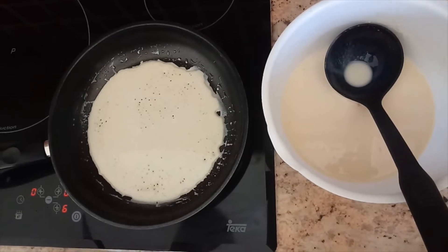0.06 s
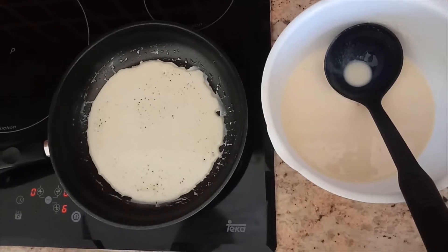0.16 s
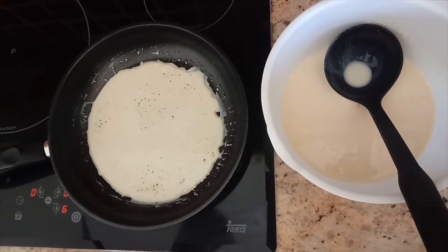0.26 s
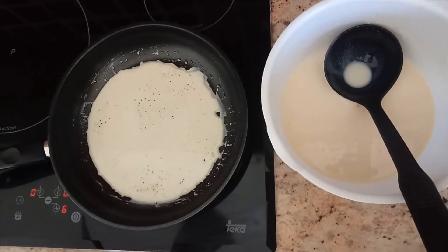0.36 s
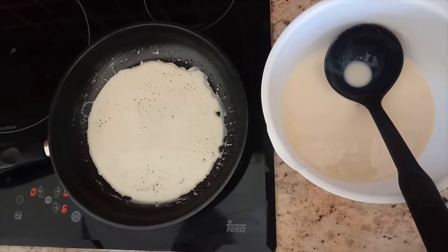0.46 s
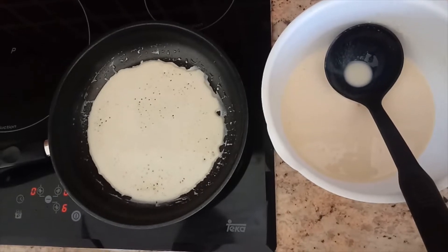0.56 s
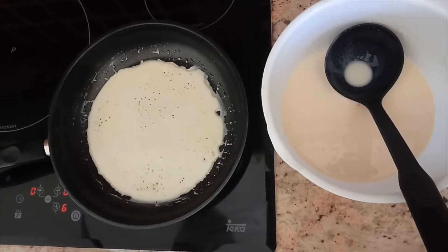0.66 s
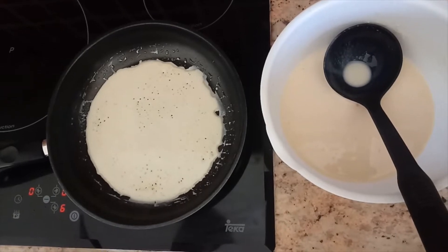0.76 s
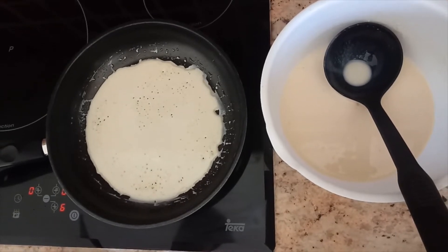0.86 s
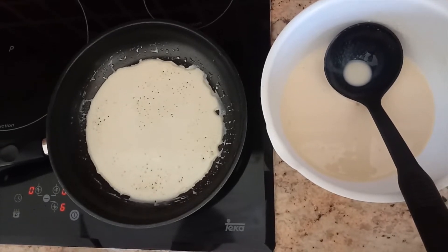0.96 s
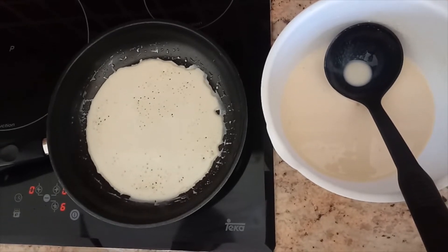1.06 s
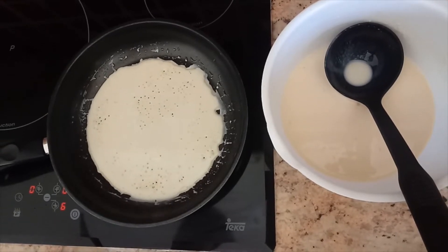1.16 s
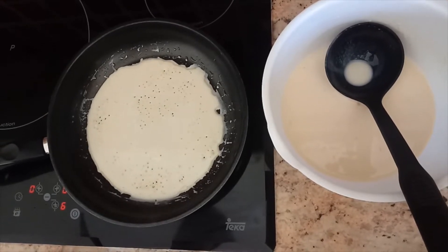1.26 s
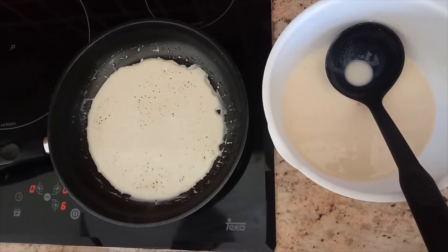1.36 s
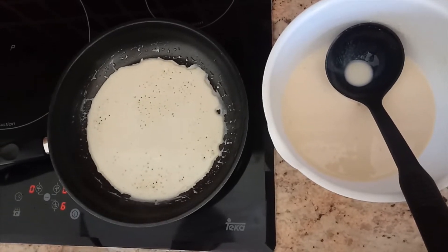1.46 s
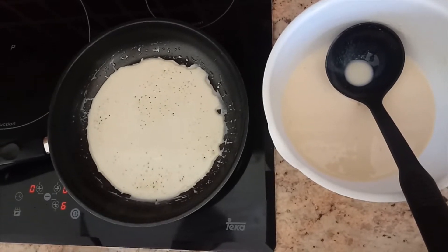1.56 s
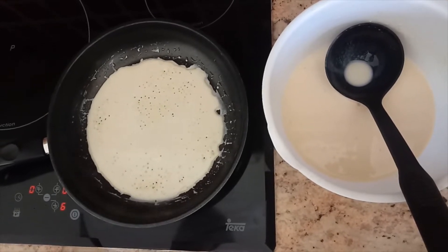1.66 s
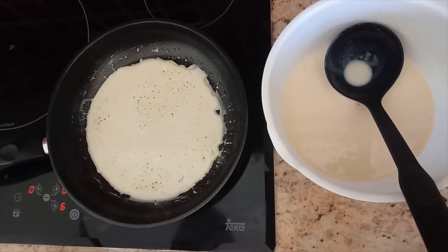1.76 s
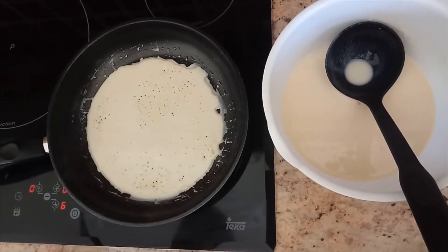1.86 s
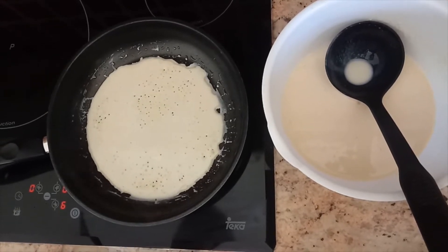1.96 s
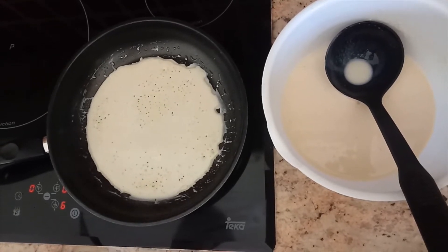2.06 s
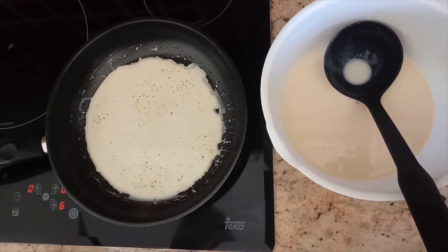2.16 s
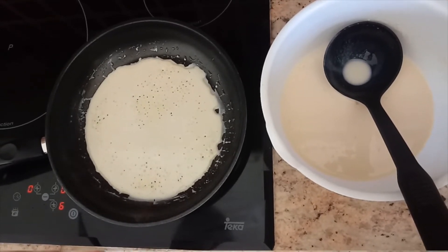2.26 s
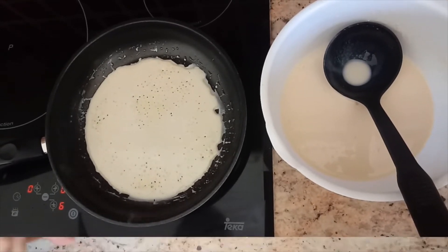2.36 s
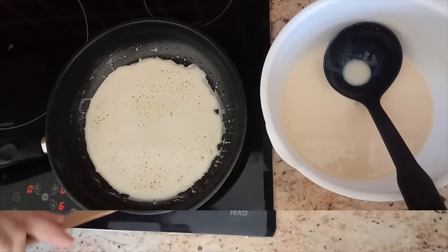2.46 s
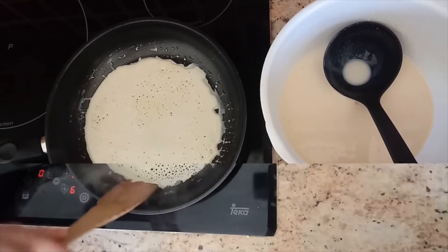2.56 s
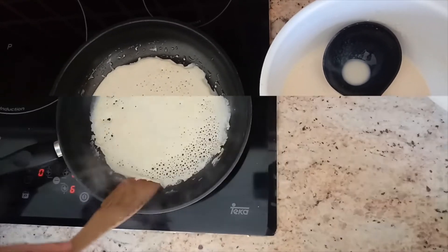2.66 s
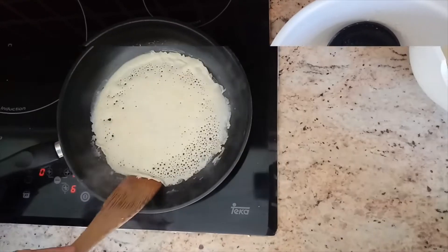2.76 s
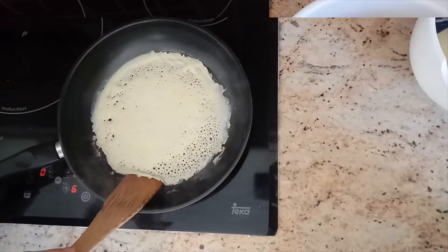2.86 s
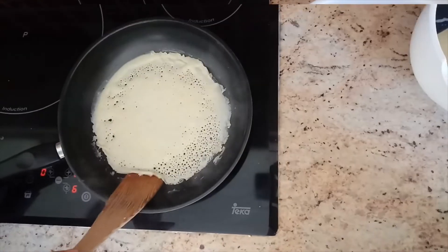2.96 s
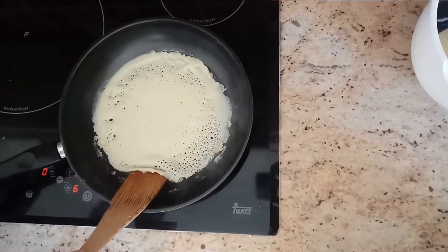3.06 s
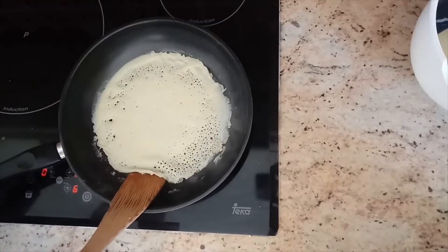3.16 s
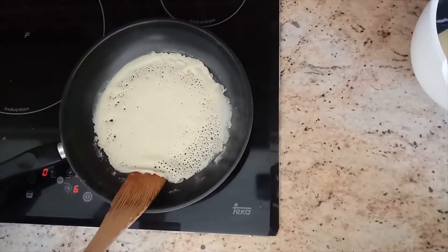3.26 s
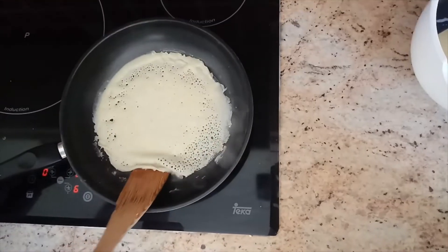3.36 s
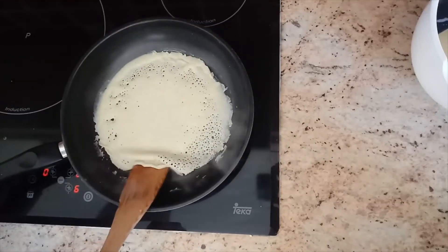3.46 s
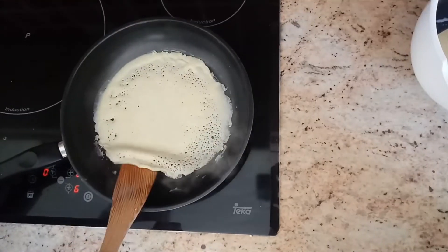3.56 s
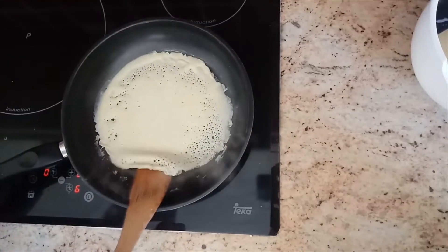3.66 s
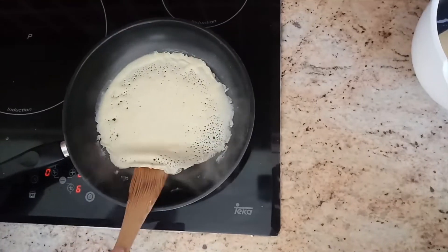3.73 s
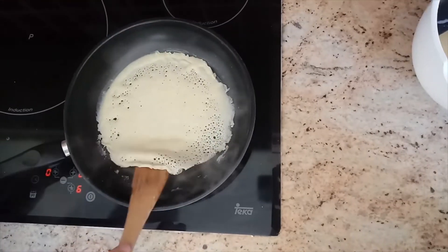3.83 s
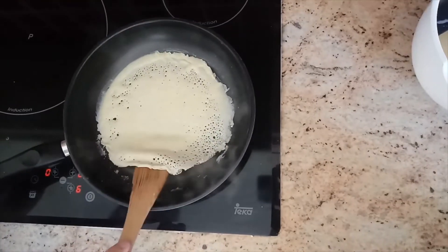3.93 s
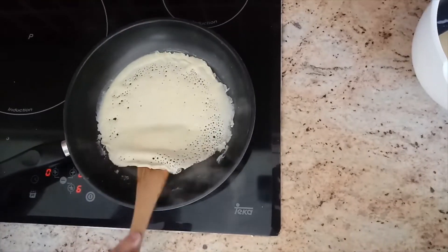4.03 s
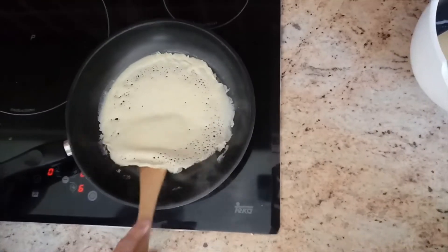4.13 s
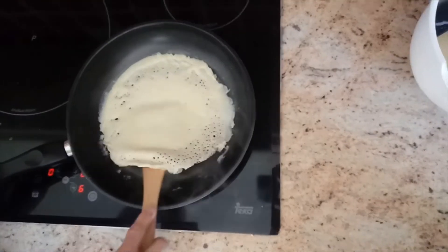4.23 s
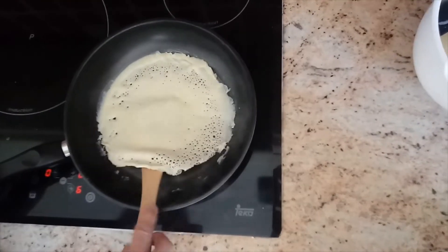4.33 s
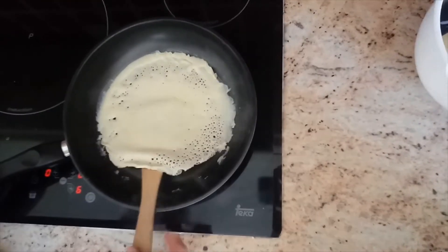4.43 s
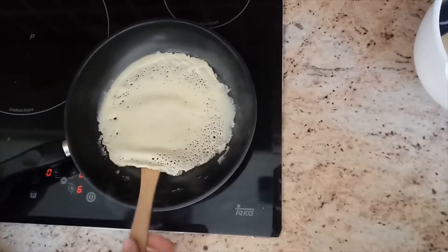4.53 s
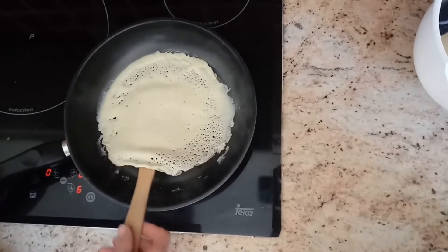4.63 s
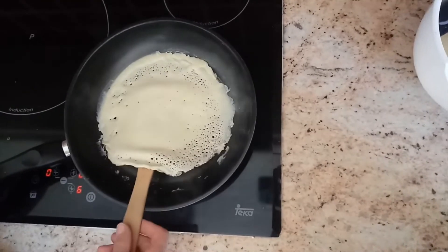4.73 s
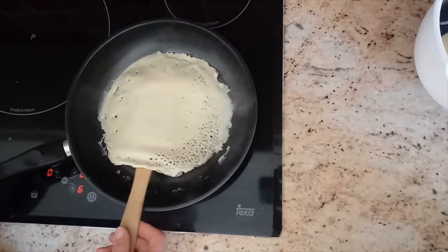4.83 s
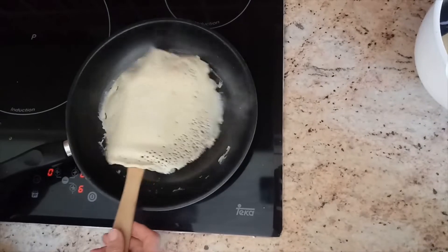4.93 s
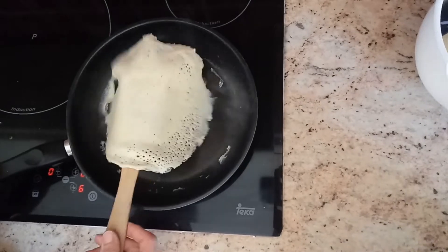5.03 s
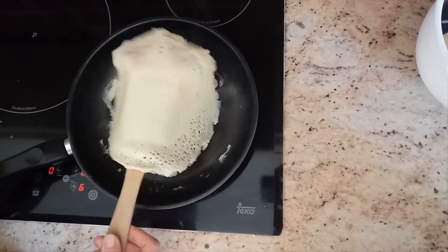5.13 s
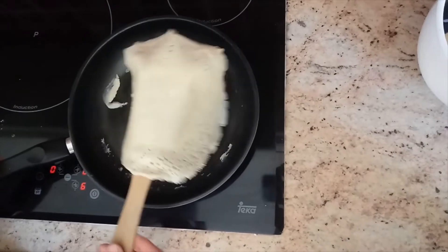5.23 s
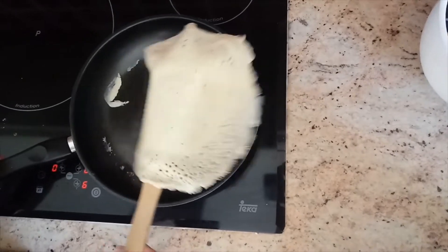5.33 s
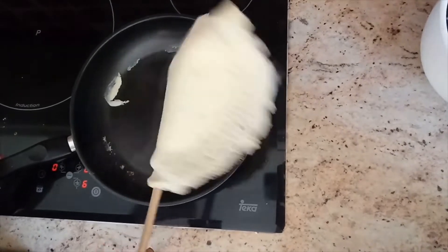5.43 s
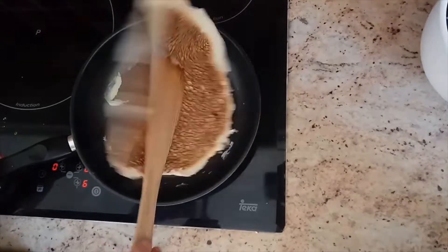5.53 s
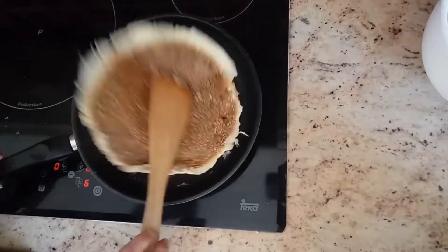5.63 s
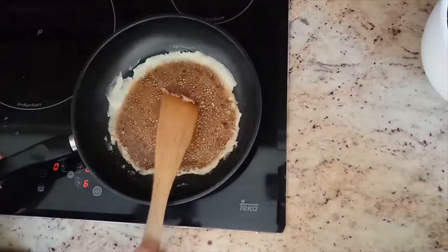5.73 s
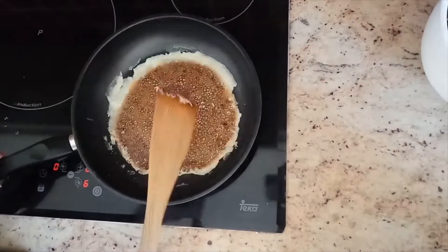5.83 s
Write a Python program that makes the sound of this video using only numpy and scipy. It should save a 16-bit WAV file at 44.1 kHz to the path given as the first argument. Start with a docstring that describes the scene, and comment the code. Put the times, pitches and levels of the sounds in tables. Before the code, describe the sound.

A pancake sizzles faintly in a pan, a wooden spatula scrapes and knocks under it, then it flips and slaps down with a loud hiss.

```python
"""A pancake sizzles faintly in a non-stick pan on a glass hob: noise grains and tiny ringing bubbles.
A wooden spatula knocks on the pan and scrapes under the edge, through damped modes of the pan.
Steam crackles out in puffs, pops and faint whistles; the pancake is lifted and flipped.
The wet side slaps onto the hot metal and hisses loudly: decaying splashes, a thump and dense noise grains.
Underneath are a sine hum and drone from the hob, a thin fluttering whine and the still air of the kitchen."""
import sys
import numpy as np
from scipy import signal
from scipy.fft import rfft, irfft, next_fast_len
from scipy.io import wavfile
from scipy.ndimage import uniform_filter1d, map_coordinates

SR = 44100
rng = np.random.default_rng(int(sys.argv[2]) if len(sys.argv) > 2 else 0)


def file_out(sig):
    """Save sig as 16-bit WAV at sys.argv[1]."""
    # one column per channel
    cols = np.atleast_2d(sig).T
    # limit, then scale
    lim = np.clip(cols, -1, 1)
    pcm = np.round(lim * 32767).astype(np.int16)
    wavfile.write(sys.argv[1], SR, pcm)


N = 259749

# parts of the wet side slapping down: start_s [s], peak_db [dB]
SLAPS = [(5.7459, -11), (5.7526, -25), (5.7737, -17), (5.823, -23)]
# modes of the freely ringing pan: pitch_hz [Hz], level_db [dB], t60_s [s]
PAN_MODES = [(202, -0.5, 0.06), (273, 0.5, 0.085), (609, -2, 0.11), (771, -4.5, 0.23), (1001, -5, 0.1),
             (1278, -4, 0.09), (1364, 1, 0.078), (1430, -14.5, 0.34), (1900, -16, 0.055), (1920, -10, 0.3),
             (2260, -3.5, 0.043), (3730, -0.5, 0.11)]
# bright sizzle spectrum, also the wooden click: freq_hz [Hz], density_db [dB per Hz]
SIZZLE_SPECTRUM = [(1000, -84), (2400, -49), (3100, -26), (3700, -8), (4800, 4), (5700, 5), (6600, 0.5),
                   (7200, -19.5), (8200, -37), (14000, -52), (14800, -20.5), (15600, -16.5), (16200, -37)]


def frying():
    """Steam bubbles burst along the rim; puffs add to them, sound the hollow underneath and throw fine spray."""
    # steady frying: time_s [s], sizzle_db [dB], spread_db of bubble sizes [dB]
    simmer = [(0, -55.5, 6), (1.0, -55, 4), (2.2, -54, 4.5), (3.2, -56.5, 8), (4.2, -57.5, 4),
              (4.8, -61, 6.5), (5.15, -68.5, 9.5), (5.7, -58, 12.5)]
    # puffs of steam from underneath: full_s [s], rise_s [s], length_s [s], sag_db [dB],
    # sizzle_db [dB], hollow_db [dB]
    puffs = [(1.057, 0.096, 0.13, 3.5, -46.5, -73), (1.343, 0.17, 0.63, 8.5, -48, -77),
             (2.585, 0.036, .16, -3, -55, -70.5), (2.841, .04, 0.085, 3, -52, -64.5),
             (3.031, 0.083, .19, -2, -43.5, -56), (3.286, 0.011, 0.044, 1.5, -44, -60.5),
             (3.417, 0.058, 0.16, 7.5, -42.5, -57.5), (3.749, 0.024, 0.035, 0, -48.5, -62.5),
             (3.869, 0.064, .45, 6, -44, -57.5), (4.448, 0.019, 0.035, 3, -49.5, -82),
             (4.675, 0.12, 0.031, 2, -54.5, -72), (4.857, .03, .04, 6, -58.5, -74.5),
             (4.955, .02, 0.027, 0.5, -55, -83), (5.231, .015, .012, 2, -56.5, -81),
             (5.331, 0.035, 0.23, 2.5, -49.5, -79.5), (5.588, .02, .06, 9, -52.5, -84)]
    # spectra of the fine spray and of the hollow under the pancake: freq_hz [Hz], density_db [dB per Hz]
    spray_spectrum = [(3000, -41), (6800, 17.5), (8400, -12.5), (9600, -3), (13000, 7), (14200, -8),
                      (15000, 19), (15700, 17), (16200, -15)]
    hollow_spectrum = [(500, -12), (1000, -20), (1300, -5), (1550, 0), (1800, 7), (2100, -2.5), (2400, 1.5),
                       (3000, -3.5), (4500, -22)]
    puff_t60_s = 0.24
    steady_hollow_db = -26  # against the steady sizzle
    spray_db, spray_at_db = -10.5, -47  # spray against the sizzle, at this sizzle level
    spray_growth = 1  # dB more spray against the sizzle for each dB of sizzle

    simmer_db, spread_db = curves(simmer)
    sizzle_level = amp(simmer_db)
    hollow_level = amp(simmer_db + steady_hollow_db)
    for full_s, rise_s, length_s, sag_db, sizzle_db, hollow_db in puffs:
        puff = swell(full_s, rise_s, length_s, sag_db, puff_t60_s)
        sizzle_level = np.hypot(sizzle_level, amp(sizzle_db) * puff)
        hollow_level = np.hypot(hollow_level, amp(hollow_db) * puff)
    spray_level = amp(spray_db) * (sizzle_level / amp(spray_at_db)) ** spray_growth

    # a wider spread of bubble sizes also comes in stronger clumps
    clumps = amp(.25 * spread_db * wobble(130))
    bursts = grains(9000, spread_db) * clumps
    fizz = coloured(bubbles(700, centre_hz=5125, scatter=.4, cycles=58), SIZZLE_SPECTRUM)
    rim = unit(coloured(bursts, SIZZLE_SPECTRUM) + 0.81 * fizz)
    rim = rim + spray_level * coloured(bursts, spray_spectrum)
    gurgle = bubbles(500, centre_hz=1750, scatter=.42, cycles=13)
    hollow = coloured(bursts + 0.53 * gurgle, hollow_spectrum)
    touch_s = SLAPS[0][0]
    return (sizzle_level * rim + hollow_level * hollow) * gate(0, touch_s, .005)


def pops():
    """A bubble or drop of fat snaps; the pan's wall returns the snap and spray patters for a moment."""
    # single bursts: start_s [s], peak_db [dB]
    snaps = [(0.545, -35.5), (0.6317, -35.5), (2.6828, -26.5), (2.8529, -26.5), (2.8802, -31),
             (2.9433, -30.5), (2.9548, -27.5), (3.0036, -26), (3.1618, -24), (3.1904, -27), (3.2005, -21),
             (3.2826, -20.5), (3.3051, -25.5), (3.3216, -32), (3.3697, -29.5), (3.5073, -25), (3.9722, -33),
             (4.8533, -29.5), (4.9427, -42.5), (5.0744, -44), (5.1673, -42.5), (5.3178, -38.5),
             (5.3453, -39), (5.378, -35), (5.4007, -35), (5.451, -31), (5.4917, -31), (5.5411, -29.5)]
    # spectrum of a snap: freq_hz [Hz], density_db [dB per Hz]
    crack_spectrum = [(400, -61), (1100, -47), (1800, -22.5), (3000, -20.5), (4500, -1.5), (6500, 4.5),
                      (7400, -10.5), (8500, -27), (13000, -21), (14300, -48), (15400, -0.5), (16300, -20)]
    patter_level, patter_t60_s = .14, 0.044  # level against the snap's impulse
    track, t = np.zeros(N), np.arange(SR // 16) / SR
    for start_s, peak_db in snaps:
        burst = patter_level * amp(-60 * t / patter_t60_s) * rng.standard_normal(len(t))
        burst[SR // 2000] += 1  # the snap
        burst[SR // 440] += .6  # its return from the wall
        add(track, start_s, peak_db, coloured(burst, crack_spectrum))
    return track


def whistle():
    """Steam through small vents in the batter sings faint notes, unsteady in pitch and level."""
    # notes: full_s [s], length_s [s], pitch_hz [Hz], level_db [dB]
    vents = [(.95, .15, 1787, -75.5), (1.11, 0.033, 1782, -60.5), (1.13, .04, 2200, -75),
             (1.17, 0.04, 2490, -78), (1.187, 0.038, 1276, -77)]
    rise_s, t60_s = .025, 0.1
    track = np.zeros(N)
    for full_s, length_s, pitch_hz, level_db in vents:
        hz = pitch_hz * (1 + .012 * wobble(150))
        level = amp(level_db + 1.6 * wobble(53.2))
        note = level * np.sin(2 * np.pi * np.cumsum(hz) / SR)
        track += note * swell(full_s, rise_s, length_s, 0, t60_s)
    return track


def scraping():
    """Wood catches and slips on the coating: a juddering rasp that rings the pan, over its rumble."""
    # pushes of the blade: full_s [s], rise_s [s], length_s [s], sag_db [dB],
    # rumble_db of the pan [dB], rasp_db of the wood [dB], centre_hz of the rasp [Hz]
    strokes = [(2.221, 0.017, 0.093, -5.5, -65.5, -63.5, 900), (2.341, 0.016, 0.22, 16, -51.5, -51.5, 800),
               (2.659, .015, .16, 8, -76, -65, 950), (3.707, 0.051, 0.23, 10, -54, -59, 610),
               (4.038, 0.024, .26, 9.5, -55.5, -57, 1300), (4.527, 0.055, 0.21, 0.5, -58, -80.5, 700)]
    # spectra of the wood's rasp and of the pan's rumble: freq_hz [Hz], density_db [dB per Hz]
    rasp_spectrum = [(300, -17), (600, 10.5), (800, 5), (1100, 5), (1400, -1.5), (1900, -9), (2500, 8),
                     (5000, -52)]
    rumble_spectrum = [(40, -33), (110, -2.5), (170, -10), (290, 0), (400, -8), (550, -30), (1200, -125)]
    stroke_t60_s, dry_level = 0.22, 1.2  # dying away; dry rasp against the ringing pan
    rasp_octaves, judder_db = 0.91, 2.6  # width about the rasp's centre; unevenness of the push

    track, t = np.zeros(N), np.arange(SR // 4) / SR
    judder = amp(judder_db * wobble(45))
    slips = grains(1200, 4.4) * judder
    rub = coloured(slips, rasp_spectrum)
    rumble = coloured(grains(3000, 2.2) * judder, rumble_spectrum)
    for full_s, rise_s, length_s, sag_db, rumble_db, rasp_db, centre_hz in strokes:
        # the angle of the blade colours the rasp
        def blade(hz):
            octaves = np.log2((hz + 1) / centre_hz)
            return np.exp(-(octaves / rasp_octaves) ** 2 / 2)
        dry_rasp = unit(filtered(rub, blade))
        # the pressure of the blade damps the pan further
        damped_pan = ring(PAN_MODES, t, scatter_db=5) * amp(-60 * t / 0.17)
        metal = signal.fftconvolve(dry_rasp, damped_pan)[:N]
        rasp = unit(unit(metal) + dry_level * dry_rasp)
        push = swell(full_s, rise_s, length_s, sag_db, stroke_t60_s)
        track += (amp(rumble_db) * rumble + amp(rasp_db) * rasp) * push
    return track


def knocks():
    """The wooden blade chatters on the pan while the contact lasts and sets it ringing."""
    # knocks: start_s [s], peak_db [dB], click_db, the bright click's peak [dB],
    # wood_db against the ring [dB], contact_s, time to the strongest chatter [s]
    hits = [(2.206, -35, -31.5, -2, 0.0024), (2.334, -34, -28.5, 0, 0.0028),
            (3.668, -41.5, -41, 1.5, 0.018), (3.834, -38, -52, 9, 0.0023), (4.033, -28, -52, 11, 0.003),
            (5.724, -48, -36.5, -10, 0.0017)]
    # spectrum of the dry wood: freq_hz [Hz], density_db [dB per Hz]
    wood_spectrum = [(100, -37), (200, -15), (500, -4.5), (900, -5.5), (1800, -2), (2500, -14.5),
                     (4000, -12), (6000, -96)]
    track, t = np.zeros(N), np.arange(SR // 3) / SR
    for start_s, peak_db, click_db, wood_db, contact_s in hits:
        contact = t / contact_s * np.exp(-t / contact_s) * rng.standard_normal(len(t))
        strike = contact + 4 * (t == 0)
        metal = signal.fftconvolve(strike, ring(PAN_MODES, t, scatter_db=2.5))[:len(t)]
        body = unit(metal) + amp(wood_db) * coloured(contact, wood_spectrum)
        add(track, start_s, peak_db, body)
        add(track, start_s, click_db, coloured(contact, SIZZLE_SPECTRUM))
    return track


def bumps():
    """The pan rocks on the glass: a soft, quickly damped note."""
    # bumps: time_s [s], peak_db [dB], pitch_hz [Hz]
    rocks = [(2.338, -37.5, 265), (3.692, -44.5, 282), (4.433, -38, 239), (5.778, -27, 248)]
    track, t = np.zeros(N), np.arange(SR // 8) / SR
    for time_s, peak_db, pitch_hz in rocks:
        push = t ** 2 * np.exp(-t / 0.0028)
        # the soft onset starts 3 ms early
        add(track, time_s - .003, peak_db, push * np.sin(2 * np.pi * pitch_hz * t))
    return track


def landing():
    """The wet side slaps down, thumps the pan and flashes into hissing, spluttering steam."""
    # modes of pan and hob under the pancake: pitch_hz [Hz], level_db [dB], t60_s [s]
    thump_modes = [(80, -1.5, 0.49), (118, 9, 0.39), (165.7, -3.5, 0.7), (220.8, 5, 0.31),
                   (293.5, -3, 0.42)]
    # the wet side frying: time_s [s], hiss_db [dB], splutter_db [dB]
    searing = [(5.76, -31.5, -38), (5.816, -29, -47.5), (5.822, -25.5, -44), (5.89, -32, -42.5)]
    # spectra of hiss and splutter: freq_hz [Hz], density_db [dB per Hz]
    hiss_spectrum = [(1500, -68), (3100, -22.5), (4200, -0.5), (5400, 5), (6600, 0.5), (7300, -13),
                     (8400, -28), (10000, -21.5), (13000, -18.5), (14200, -25), (15000, -7), (15600, -4),
                     (16200, -51)]
    splutter_spectrum = [(30, -6), (110, 3), (280, -1), (420, 7.5), (900, 14), (2500, 9), (3500, 12),
                         (6000, -41)]
    track, t = np.zeros(N), np.arange(SR // 4) / SR
    touch_s = SLAPS[0][0]
    add(track, touch_s, -23, ring(thump_modes, t, scatter_db=3))
    for start_s, peak_db in SLAPS:
        splash = amp(-60 * t / 0.047) * rng.standard_normal(len(t))
        slap = coloured(splash, hiss_spectrum) + 0.33 * coloured(splash, splutter_spectrum)
        add(track, start_s, peak_db, slap)
    hiss_db, splutter_db = curves(searing)
    bursts = grains(14000, 5) * amp(1.2 * wobble(120))
    steam = amp(hiss_db) * coloured(bursts, hiss_spectrum)
    steam += amp(splutter_db) * coloured(bursts, splutter_spectrum)
    return track + steam * gate(touch_s + 0.0016, N / SR, 0.00067)


def whine():
    """A thin high whine, a narrow band of noise, comes and goes in quick, uneven pulses."""
    # whines: start_s [s], length_s [s], pitch_hz [Hz], level_db [dB]
    tones = [(0, .45, 10830, -79), (4.52, 1, 11430, -81)]
    flutter_hz, width_hz = 28.97, 250
    track = np.zeros(N)
    pulses = np.sin(np.pi * flutter_hz * np.arange(N) / SR + .5 * wobble(15)) ** 4
    flutter = pulses * amp(5 * wobble(flutter_hz))
    for start_s, length_s, pitch_hz, level_db in tones:
        def narrow(hz):
            return np.exp(-((hz - pitch_hz) / width_hz) ** 2 / 2)
        band = filtered(rng.standard_normal(N), narrow)
        track += amp(level_db) * unit(band * flutter) * gate(start_s, start_s + length_s, .02)
    return track


def hob():
    """The hob hums at twice the mains frequency and drones faintly over the still air of the kitchen."""
    # the hum's level: time_s [s], level_db [dB]
    hum_curve = [(0, -69), (1.2, -75), (3.4, -65.5), (4.4, -58.5), (4.9, -65.5), (5.9, -66.5)]
    # spectrum of the still air: freq_hz [Hz], density_db [dB per Hz]
    air_spectrum = [(20, -32), (60, -8.5), (100, 2.5), (160, -4), (300, -6), (600, -12), (1300, -11.5),
                    (2200, -53), (4000, -29), (16000, -72)]
    hum_hz = 100
    hum_db, = curves(hum_curve)
    hum = np.sin(2 * np.pi * hum_hz * np.arange(N) / SR + .3 * wobble(12)) * amp(wobble(7))
    drone = coloured(rng.standard_normal(N), [(55, -4), (80, -2.5), (112, -7.0), (150, -28.0)])
    air = coloured(rng.standard_normal(N), air_spectrum)
    return amp(hum_db) * (hum + 0.14 * drone) + amp(-74.5) * air


def kitchen(x):
    """The walls answer 5 ms later with a noise tail; each frequency dies at its own speed."""
    # decay of the room: freq_hz [Hz], t60_s [s]
    decay = [(150, 0.24), (1500, 0.17), (6000, 0.083), (15000, 0.05)]
    hz, t, z = signal.stft(rng.standard_normal(SR // 2), SR, nperseg=256)
    fade = amp(-60 * t / along(decay, hz)[:, None])
    tail = signal.istft(z * fade, SR, nperseg=256)[1]
    delayed = np.pad(x, (SR // 200, 0))
    return signal.fftconvolve(delayed, tail / np.linalg.norm(tail))[:N]


def bubbles(rate, centre_hz, scatter, cycles):
    """Tiny bubbles, rate a second, each ringing briefly at its own pitch and size; rms 1."""
    start, pitch, size = rng.random((int(rate * N / SR), 3)).T[:, :, None]
    hz = centre_hz * np.exp(scatter * (2 * pitch - 1))
    age = np.arange(SR // 50)  # in samples
    phase = hz * age / SR  # in cycles
    waves = amp(-18 * size) * np.sin(2 * np.pi * phase) * np.exp(-phase / cycles)
    places = (start * N).astype(int) + age
    return unit(np.bincount(places.ravel(), waves.ravel(), N)[:N])


def grains(rate, spread_db):
    """Random tiny impulses, rate a second, of log-normal size and steady mean power."""
    size = amp(spread_db * np.clip(rng.standard_normal(N), -2.8, 2.8))
    x = size * rng.choice([-1, 1], N) * (rng.random(N) < rate / SR)
    return x / np.sqrt(np.abs(uniform_filter1d(x ** 2, size=4096)) + 1e-9)


def ring(modes, t, scatter_db):
    """Damped modes of alternating sign, with strengths scattered afresh at each call."""
    total = 0
    for k, (hz, level_db, t60_s) in enumerate(modes):
        decay = amp(level_db + scatter_db * rng.standard_normal() - 60 * t / t60_s)
        total = total + decay * np.sin(2 * np.pi * hz * t) * (-1) ** k
    return total


def swell(full_s, rise_s, length_s, sag_db, t60_s):
    """Rises to 1 at full_s, sags (or grows, if negative) while it lasts, then dies away."""
    t = np.arange(N) / SR - full_s
    rise = np.clip(1 + t / rise_s, 0, 1)
    sag = -sag_db * np.clip(t / length_s, 0, 1)
    return rise * amp(sag - 60 * np.maximum(t - length_s, 0) / t60_s)


def gate(start, end, edge):
    """1 between two times, with edges that slope to 0 outside them."""
    t = np.arange(N) / SR
    return np.clip(np.minimum(t - start, end - t) / edge + 1, 0, 1)


def wobble(rate):
    """A smooth random curve, rate knots a second."""
    knots = rng.standard_normal(int(N * rate / SR) + 4)
    return map_coordinates(knots, [np.arange(N) * rate / SR])


def curves(rows):
    """One value per sample for each column after the time."""
    s, *cols = np.transpose(rows)
    return [np.interp(np.arange(N) / SR, s, c) for c in cols]


def along(points, hz):
    """(Hz, value) points read off along a log frequency axis."""
    f, v = np.transpose(points)
    return np.interp(np.log(hz + 1), np.log(f + 1), v)


def filtered(x, response):
    """x times a response of frequency."""
    n = x.shape[-1]
    m = next_fast_len(n + 8192)
    return irfft(rfft(x, m) * response(np.fft.rfftfreq(m, 1 / SR)), m)[..., :n]


def coloured(x, spectrum):
    """x shaped by a spectrum, at rms 1."""
    return unit(filtered(x, lambda hz: amp(along(spectrum, hz))))


def add(track, start_s, peak_db, sound):
    """Put a sound into a track at a time and a peak level."""
    part = track[round(start_s * SR):][:len(sound)]
    part += amp(peak_db) * sound[:len(part)] / np.abs(sound).max()


def amp(db):
    """Decibels as an amplitude factor."""
    return 10 ** (np.asarray(db) / 20)


def unit(x):
    """x at rms 1."""
    return x / np.sqrt(np.mean(x ** 2) + 1e-20)


def scene():
    """Everything sits in the middle; only the room's answer to the landing spreads a little to the sides."""
    # stereo width: freq_hz [Hz], side_db, the gain of the side's room sound [dB]
    width = [(1500, -55), (3000, -34), (5000, -24), (9000, -18), (15000, -21)]
    flop = landing()
    near = frying() + whistle() + pops() + scraping() + knocks() + bumps() + flop
    mid = near + amp(-12.5) * kitchen(near) + hob() + whine()
    side = filtered(kitchen(flop), lambda hz: amp(along(width, hz)))
    return np.array([mid + side, mid - side])


def record(dry):
    """The microphone cancels narrow bands at odd multiples of one frequency and has a band limit."""
    notch_hz, half_width_hz, top_hz = 2830, 260, 16200

    def response(hz):
        comb = np.abs(np.cos(np.pi / 2 * hz / notch_hz))
        notches = comb / np.hypot(comb, np.pi / 2 * half_width_hz / notch_hz)
        return notches * (hz < top_hz)
    return filtered(dry, response)


dry = scene()
out = record(dry)
file_out(out)
```